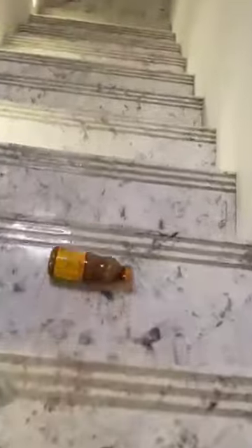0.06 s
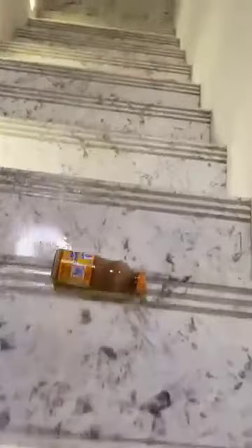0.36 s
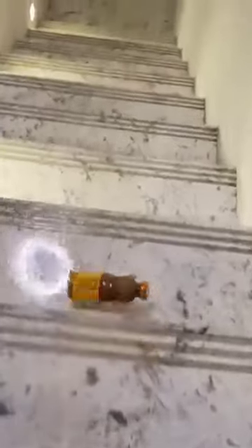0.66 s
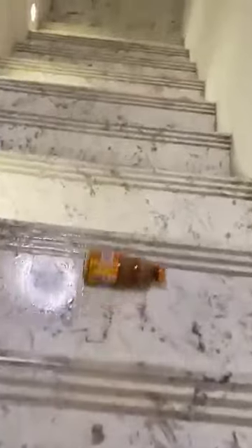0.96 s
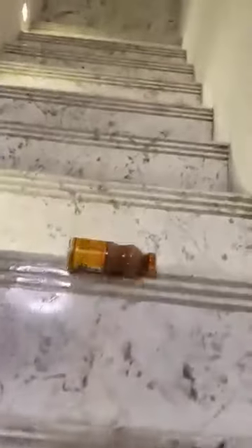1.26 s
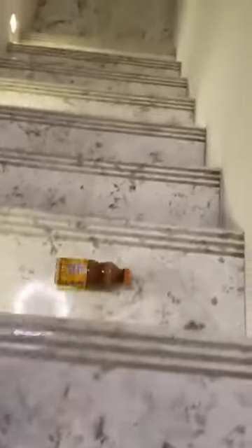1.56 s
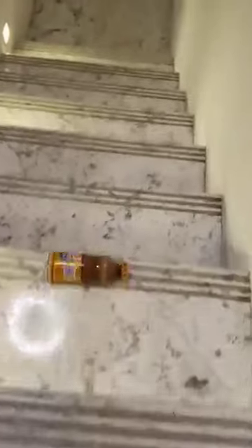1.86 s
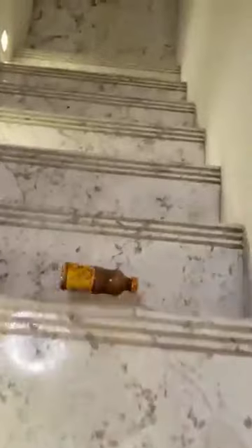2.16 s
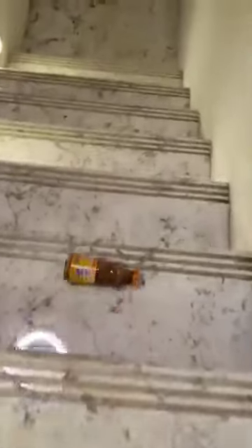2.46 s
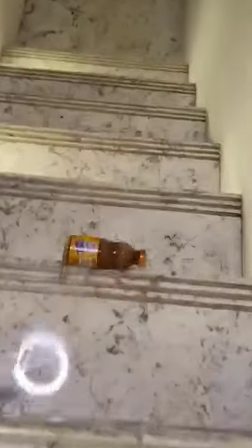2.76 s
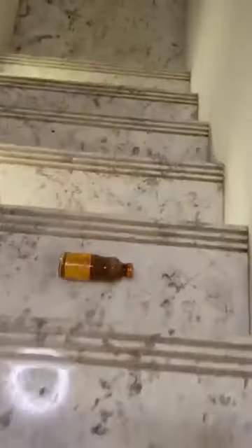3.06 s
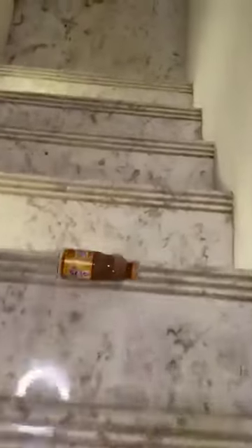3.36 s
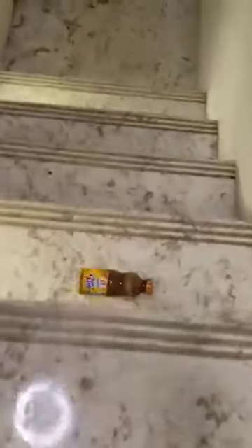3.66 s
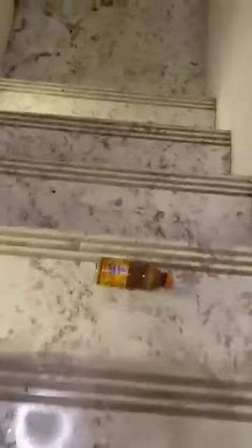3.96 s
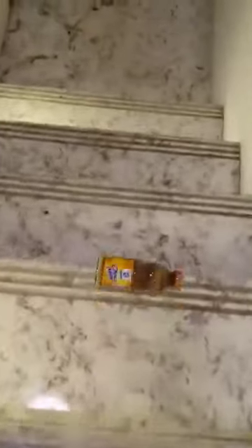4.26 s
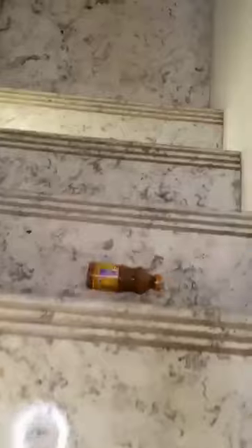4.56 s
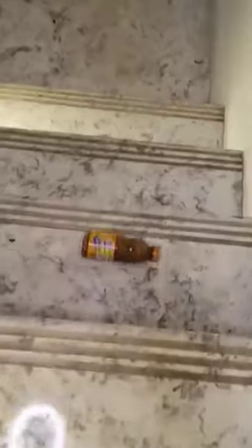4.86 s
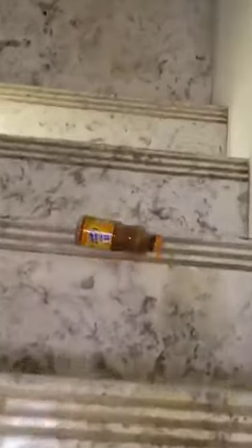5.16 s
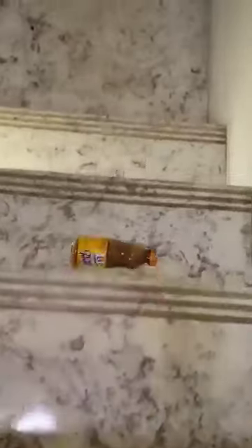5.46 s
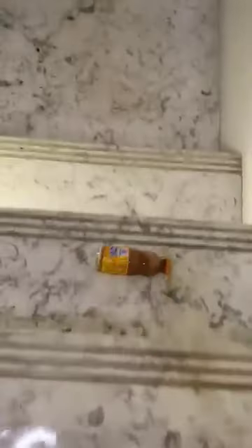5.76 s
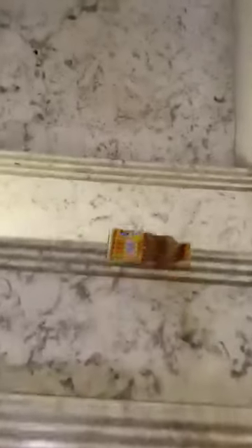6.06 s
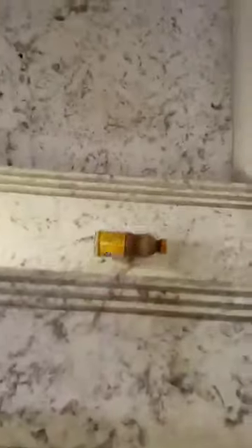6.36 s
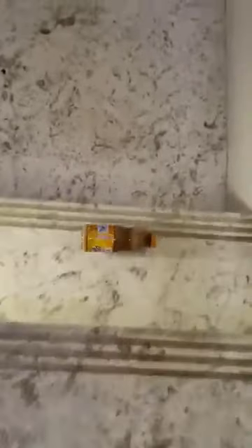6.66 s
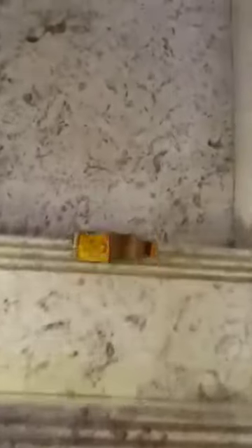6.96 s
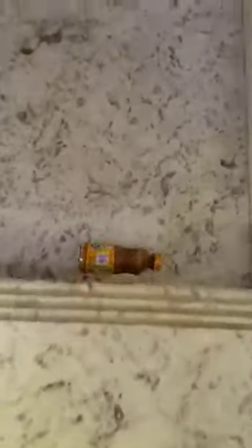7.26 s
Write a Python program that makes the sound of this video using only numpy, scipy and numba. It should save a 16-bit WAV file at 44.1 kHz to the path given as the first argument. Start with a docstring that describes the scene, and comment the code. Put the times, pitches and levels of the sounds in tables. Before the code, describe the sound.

A part-filled plastic bottle rolls down a bare stone stairwell, heard from a phone microphone following close behind. The tail of an earlier impact is still ringing at the start. The bottle lands with a sharp, bright crack at about 0.7, 1.5, 2.2, 3.0, 3.7, 4.6, 5.6 and 6.3 seconds, each with a tiny double bounce and a short echo off the walls. Between landings it wobbles and crosses grooves in clusters of about three lighter, hollow knocks, with brief grinding and a faint slosh of liquid. A last, more hollow cluster comes near 7 seconds. A few soft footsteps and scuffs follow, the clearest thud at about 2.7 seconds and a gritty scuff near 4.2. Underneath are a low rumble, a very faint high whine and a throbbing machine hum that fades from about 3 seconds. Brief low drones swell around 2 to 3 seconds.

```python
"""A bare stone stairwell: a part-filled plastic bottle rolls down, followed by someone with a phone.
Each landing is an impact that excites the shell's modes and the reverberation of the walls. Between
landings the bottle wobbles, knocks over grooves and grinds along the tread while its drink sloshes.
Soft footsteps follow. Two machines beat in a hum that fades with the descent, over rumble, brief
drones and a thin whine. The phone's gain control ducks under every crack."""
import sys
import numpy as np
from scipy import signal
from scipy.fft import rfft, irfft, next_fast_len
from scipy.io import wavfile
from scipy.ndimage import uniform_filter1d, minimum_filter1d
from numba import njit

SR = 44100
rng = np.random.default_rng(int(sys.argv[2]) if len(sys.argv) > 2 else 0)


def store_wav(level_fs):
    """Save 16-bit WAV to argv[1]."""
    pcm = np.round(np.clip(np.atleast_2d(level_fs), -1, 1) * 32767)
    wavfile.write(sys.argv[1], SR, pcm.T.astype(np.int16))


N = 321489
LEAD = SR // 2  # samples before time zero, so an earlier landing is still ringing
TOTAL = N + LEAD
TIME = (np.arange(TOTAL) - LEAD) / SR


def undb(db):
    """Amplitude ratio of a level in decibels."""
    return 10 ** (np.asarray(db) / 20)


def on_log_axis(points, hz):
    """Interpolation of (frequency_hz, level_db) points along a log-frequency axis."""
    point_hz, level_db = np.transpose(points)
    return np.interp(np.log(np.maximum(hz, 1)), np.log(point_hz), level_db)


def response(points, tilt_db=0, size=2048):
    """Minimum-phase impulse response of a spectrum, tilted by tilt_db per octave."""
    hz = np.maximum(np.fft.rfftfreq(size, 1 / SR), 20)
    cepstrum = irfft(np.log(undb(on_log_axis(points, hz) + tilt_db * np.log2(hz / 2500))))
    cepstrum[1:size // 2] *= 2
    cepstrum[size // 2 + 1:] = 0
    return irfft(np.exp(rfft(cepstrum)))


def noise(points, count):
    """Spectral shaping of white noise, scaled to unit rms."""
    gain = undb(on_log_axis(points, np.fft.rfftfreq(count, 1 / SR)))
    coloured = irfft(rfft(rng.standard_normal(count)) * gain, count)
    return coloured / coloured.std()


def fade(t, t60):
    """Exponential decay, 60 dB down after t60 seconds."""
    return np.exp(-np.log(1000) * t / t60)


def rise(t, time_constant_s):
    """Exponential approach to full amplitude."""
    return 1 - np.exp(-t / time_constant_s)


def add(track, start_s, sound):
    """Superposition of a sound on a track."""
    i = int(round(start_s * SR)) + LEAD
    track[i:i + len(sound)] += sound[:len(track) - i]


# Spectrum of plastic striking stone: frequency_hz, level_db
CONTACT_SPECTRUM = [(60, -38), (300, -18), (700, -24.5), (1200, -4), (2500, -13), (4600, -7), (5500, -9.5),
                    (8000, -14), (9300, -19.5)]
# Modes of the bottle's shell: pitch_hz, level_db, t60_s
SHELL_MODES = [(1444, -14.5, 0.0058), (1880, -1.5, 0.0045), (2247, 9, 0.0034), (2670, 3, 0.0039),
               (3797, 7.5, 0.004), (4194, 5, 0.0026)]
def impact(tilt_db, high_db, pitch_ratio, shell_db=-15):
    """Impulse excitation: a contact tick, and damped shell modes that ring for milliseconds."""
    t = np.arange(2048) / SR
    ring = 0
    for hz, db, t60 in SHELL_MODES:
        # the spot that strikes decides how much the high modes ring
        mode_db = db + tilt_db * np.log2(hz / 2500) + high_db * (hz > 3300)
        ring += undb(mode_db) * np.sin(2 * np.pi * pitch_ratio * hz * t) * fade(t, t60)
    return response(CONTACT_SPECTRUM, tilt_db) + undb(shell_db) * ring * rise(t, 0.00037)


# Reverberation bands of the stairwell: centre_hz, t60_s, level_db
REVERB_BANDS = [(108, 1.62, -9.5), (463, 1.155, -10), (910, 1.09, -9.5), (2150, 0.93, -10),
                (4370, 0.81, -1), (6080, 0.7, 4), (9320, 0.53, 0.5), (14000, 0.62, -2)]
# Standing waves between its walls: pitch_hz, level_db, t60_s
ROOM_MODES = [(199.6, -46.5, 3), (391.6, -36.5, 1.8), (581, -39.5, 1.7), (757, -34.5, 1.4),
              (1130, -42.5, 0.81), (1550, -39, 0.76)]
def stairwell(wet_db, gap_s=0.0016, build_s=0.017, early_gain=0.32, size=65536):
    """Room impulse response: direct sound, then reflections that build up and lose their treble first."""
    t, hz = np.arange(size) / SR, np.fft.rfftfreq(size, 1 / SR)
    # scattered strong reflections stand out of the early wash
    scatter = rng.standard_normal(size) * undb(3.7 * rng.standard_normal(size) * fade(t, 0.89))
    white = rfft(scatter / np.sqrt(uniform_filter1d(scatter ** 2, size=1024)))
    log_centres = np.log([band[0] for band in REVERB_BANDS])
    tail = 0
    for selector, (_, t60, db) in zip(np.eye(len(log_centres)), REVERB_BANDS):
        band_gain = np.interp(np.log(hz + 1), log_centres, selector)
        tail += undb(db) * irfft(white * band_gain) * fade(t, t60)
    for mode_hz, db, t60 in ROOM_MODES:
        tail += undb(db) * np.sin(2 * np.pi * (mode_hz * t + rng.random())) * fade(t, t60)
    room = undb(wet_db) * tail * np.clip((t - gap_s) / build_s, early_gain, 1)
    room[0] += 1  # direct sound
    return room


def reverberate(track, wet_db):
    """Convolution with the stairwell's impulse response."""
    return signal.fftconvolve(track, stairwell(wet_db))[:TOTAL]


def hops(count=2, flight_s=0.048, restitution=0.8, first_db=-15.5, loss_db=5):
    """Inelastic bouncing: each hop is weaker and, on average, shorter. Gives (delay_s, level_db)."""
    order = np.arange(count)
    flights_s = flight_s * restitution ** order * (0.5 + rng.random(count))
    return zip(np.cumsum(flights_s), first_db - loss_db * order)


# Landings on the steps: start_s, level_db, high_modes_db, pitch_ratio, tilt_db_per_octave,
# echo_delay_ms, echo_db
LANDINGS = [(-.15, 12.5, -4, 1.06, 2.5, 5.15, -9.5), (0.6724, 16.5, -3, 1.018, 1, 14.2, -14),
            (1.4883, 17.5, -6, 0.99, 1.5, 2.37, -15), (2.2433, 15.5, -4, 1.02, 2, 4, -7.5),
            (2.9604, 16, -4.5, 1.025, 3, 5.14, -9), (3.7040, 12, -3.5, 1.018, 1.5, 6.65, -9.5),
            (4.588, 13.5, -3.5, 1.063, 2, 6.3, -11.5), (5.5690, 13.5, -2, 1.01, 1.5, 7.55, -12),
            (6.3377, 14, -2.5, 1.06, 1.5, 4.9, -11.5)]
def landings(level_db=31.5, wet_db=-26):
    """Impact and close echo: each crack reflects off nearby stone, then the bottle hops."""
    out = np.zeros(TOTAL)
    for start_s, db, high_db, pitch_ratio, tilt_db, echo_delay_ms, echo_db in LANDINGS:
        contact = impact(tilt_db, high_db, pitch_ratio)
        crack = undb(level_db + db) * signal.fftconvolve(contact, stairwell(wet_db))
        add(out, start_s, crack)
        add(out, start_s + echo_delay_ms / 1000, undb(echo_db) * crack)
        for delay_s, hop_db in hops():
            add(out, start_s + delay_s, undb(hop_db) * crack)
    return out


def descent_db(from_s=2.89, loss_db_per_s=5):
    """Attenuation with distance: the machines are steady on the upper steps, then fade."""
    return -loss_db_per_s * np.maximum(TIME - from_s, 0)


def machine_hum(level_db=-15.5, pitch_hz=52.0, beat_hz=6.78, second_db=-4.5, in_phase_s=0.061):
    """Beating: two machines at slightly different speeds interfere at their difference frequency."""
    drift_hz = 0.3 * np.interp(TIME, np.arange(-1, 9), rng.standard_normal(10))
    cycles = np.cumsum(pitch_hz + drift_hz) / SR
    first = np.sin(2 * np.pi * cycles)
    second = np.sin(2 * np.pi * (cycles + beat_hz * (TIME - in_phase_s)))
    return undb(level_db + descent_db()) * (first + undb(second_db) * second)


# Spectrum of the building's air and rumble: frequency_hz, level_db
AIR_SPECTRUM = [(20, -17.5), (40, -4.5), (65, 13), (90, 7), (125, -9), (250, -14.5), (700, -28),
                (2000, -18.5), (5000, -26.5), (9000, -41), (15000, -39)]
def air_rumble(mean_db=-28.5, fade_share=0.26):
    """Broadband background noise, whose level follows a share of the machines' attenuation."""
    distance_db = descent_db()
    level_db = mean_db + fade_share * (distance_db - distance_db.mean())
    return undb(level_db) * noise(AIR_SPECTRUM, next_fast_len(TOTAL))[:TOTAL]


# Partials of a faint electrical whine: pitch_hz, level_db
WHINE_PARTIALS = [(9130, -60.5), (9819, -60)]
def electrical_whine():
    """Superposition of steady pure tones in the high treble."""
    return sum(undb(db) * np.sin(2 * np.pi * hz * TIME) for hz, db in WHINE_PARTIALS)


def knock(detune, pitch_spread=0.13, cutoff_hz=900):
    """Weak radiation of bass: a light touch of the shell moves little air and is duller than a landing."""
    touch = impact(tilt_db=-2, high_db=-8, pitch_ratio=1 + pitch_spread * detune)
    return signal.sosfilt(signal.butter(2, cutoff_hz, "high", fs=SR, output="sos"), touch)


# Treads, each with three grooves along its edge: first_groove_s, second_groove_s, third_groove_s,
# knock_db, rise_db_per_groove, hollow_db, slosh_db
TREAD_CROSSINGS = [(.2056, .275, .3667, -1, 0, -5, 3), (1.038, 1.107, 1.1885, 1, -0.5, -5, 8),
                   (1.853, 1.915, 1.9567, -1, -4.5, -6, -0.5), (2.561, 2.629, 2.6825, 1, -4, -5, 4.5),
                   (3.296, 3.361, 3.438, 0.5, -1, -5, 6), (4.11, 4.168, 4.2615, -5, -4, -3, -6),
                   (5.044, 5.1353, 5.2235, -2.5, -2, -4, -3.5),
                   (5.9249, 5.9877, 6.0613, -1.5, -0.5, -1, -3),
                   (6.845, 6.91, 6.9895, -13, 3.5, 15.5, -0.5)]
def wobble(count=5, lead_s=0.081, span_s=0.25, tap_db=-12.5):
    """Intermittent contact: the uneven bottle taps each tread at random as it nears the edge."""
    out = np.zeros(TOTAL)
    for first_groove_s, _, _, knock_db, *_ in TREAD_CROSSINGS:
        for when, spot in rng.random((count, 2)):
            tap = undb(knock_db + tap_db) * knock(2 * spot - 1)
            add(out, first_groove_s - lead_s + when * span_s, tap)
    return out


def grooves():
    """Surface discontinuities: each groove gives one jolt, (start_s, knock_db, hollow_db, slosh_db)."""
    for *times_s, knock_db, rise_db, hollow_db, slosh_db in TREAD_CROSSINGS:
        for k, start_s in enumerate(times_s):
            yield start_s, knock_db + rise_db * (k - 1), hollow_db, slosh_db


# Modes of the bottle's hollow body: pitch_hz, level_db, t60_s
BODY_MODES = [(866, -8, .06), (1320, -0.5, 0.077), (2126, -0.5, .08)]
def hollow_ring(t, level_db=-33):
    """Free vibration: the whole body rings briefly after a soft knock."""
    ring = sum(undb(db) * np.sin(2 * np.pi * hz * t) * fade(t, t60) for hz, db, t60 in BODY_MODES)
    return undb(level_db) * ring * rise(t, 0.006)


def slosh(t, detune, centre_hz=658, pitch_spread=0.042, bend=0.3, bend_s=0.0018, t60_s=0.038):
    """Damped oscillation: the jolted drink gulps with a falling pitch."""
    settled_hz = centre_hz * (1 + pitch_spread * detune)
    hz = settled_hz * (1 + bend * np.exp(-t / bend_s))
    return np.sin(2 * np.pi * np.cumsum(hz) / SR) * fade(t, t60_s) * rise(t, 0.0034)


def tread_knocks(shell_db=13, liquid_db=-12, shoulder_lag_s=0.007, shoulder_db=-5.5):
    """Shock excitation: the wobbling bottle hits each groove, base then shoulder, and jolts its drink."""
    out, t = np.zeros(TOTAL), np.arange(SR // 8) / SR
    for start_s, knock_db, hollow_db, slosh_db in grooves():
        base_detune, shoulder_detune, lag_scatter, slosh_detune = rng.standard_normal(4)
        strength = undb(shell_db + knock_db)
        shoulder_s = start_s + shoulder_lag_s * np.exp(lag_scatter / 2)
        add(out, start_s, strength * knock(base_detune))
        add(out, start_s, strength * undb(hollow_db) * hollow_ring(t))
        add(out, shoulder_s, strength * undb(shoulder_db) * knock(shoulder_detune))
        add(out, start_s, undb(liquid_db + slosh_db) * slosh(t, slosh_detune))
    return reverberate(out + undb(shell_db) * wobble(), wet_db=-27.5)


# Spectrum of the bottle rolling on stone: frequency_hz, level_db
ROLLING_SPECTRUM = [(100, -27), (280, 1), (420, 3), (650, 5.5), (900, 6), (1500, -6.5), (2400, -13),
                    (4000, -49.5)]
def grinding(level_db=-23, t60_s=0.21):
    """Rolling noise: after each groove the bottle grinds on across the tread for a moment."""
    out, t = np.zeros(TOTAL), np.arange(SR // 3) / SR
    envelope = undb(level_db) * fade(t, t60_s) * rise(t, 0.0057)
    for start_s, *_ in grooves():
        add(out, start_s, envelope * noise(ROLLING_SPECTRUM, len(t)))
    return reverberate(out, wet_db=-27)


# Spectrum of a sole's thud: frequency_hz, level_db
THUD_SPECTRUM = [(40, -16), (120, 1), (200, 14.5), (420, 33), (800, -1.5), (1500, -74), (5000, -42)]
# Spectrum of a sole's scuff: frequency_hz, level_db
SCUFF_SPECTRUM = [(300, -15), (1500, -7), (4000, -9), (7500, 0), (9500, 6), (14000, 6)]
# Footfalls: start_s, sole_db, grit_db
FOOTFALLS = [(1.343, -16, -20), (2.704, 13, -7), (3.428, 0, -11), (4.167, -12, 13.5), (5.137, -36, -3),
             (6.817, -1, -29)]
def footsteps(thud_db=-14.5, thud_t60_s=0.046, scuff_db=-26, scuff_t60_s=0.074):
    """Cushioned impact and friction: soft soles thud on the treads and scrape a little grit."""
    out, t = np.zeros(TOTAL), np.arange(SR // 4) / SR
    for start_s, sole_db, grit_db in FOOTFALLS:
        thud = undb(thud_db + sole_db) * noise(THUD_SPECTRUM, len(t)) * fade(t, thud_t60_s)
        scuff = undb(scuff_db + grit_db) * noise(SCUFF_SPECTRUM, len(t)) * fade(t, scuff_t60_s)
        add(out, start_s, (thud + scuff) * rise(t, 0.0026))
    return reverberate(out, wet_db=-36)


# Brief drones in the stairwell: middle_s, pitch_hz, level_db, length_s
DRONE_TONES = [(2.074, 151, -31.5, .25), (2.703, 204, -24.5, 0.138), (2.998, 198, -40.5, 0.91)]
def drones():
    """Amplitude modulation: low pure tones swell and die away under Gaussian envelopes."""
    out = np.zeros(TOTAL)
    for middle_s, hz, db, length_s in DRONE_TONES:
        swell = np.exp(-(2 * (TIME - middle_s) / length_s) ** 2)
        out += undb(db) * np.sin(2 * np.pi * hz * TIME) * swell
    return out


def scene():
    """Linear superposition: all sources add at one microphone."""
    moving = landings() + tread_knocks() + grinding() + footsteps()
    building = machine_hum() + air_rumble() + electrical_whine() + drones()
    mono = (moving + building)[LEAD:]
    return np.array([mono, mono])


@njit
def follow(rectified, attack, release):
    """Envelope detection with separate rise and fall rates, already settled on the opening sound."""
    out, level = np.empty(len(rectified)), 2 * np.mean(rectified[:512])
    for i, sample in enumerate(rectified):
        level += (sample - level) * (attack if sample > level else release)
        out[i] = level
    return out


# Response of the phone's microphone, which loses the top treble: frequency_hz, gain_db
MIC_RESPONSE = [(20, -7), (9200, -4.5), (9800, -15), (10400, -27.5), (15000, -38)]
def record(dry, knee_db=-11.0, ratio=2.25, release_s=0.089, attack_s=0.00045, cutoff_hz=15800):
    """Dynamic range compression: gain ducks under each crack; limiting, clipping and a low-pass follow."""
    mono = signal.fftconvolve(dry[0], response(MIC_RESPONSE))[:N]
    envelope = follow(np.abs(mono), 1 / (attack_s * SR), 1 / (release_s * SR))
    mono *= np.minimum(1, undb(knee_db) / (envelope + 1e-9)) ** (1 - 1 / ratio)
    # centred windows let the limiter look a little ahead
    limiter_gain = minimum_filter1d(1 / np.maximum(np.abs(mono), 1), size=21)
    mono = np.clip(mono * uniform_filter1d(limiter_gain, size=21), -1, 1)
    mono = signal.sosfilt(signal.ellip(8, 0.2, 70, cutoff_hz, fs=SR, output="sos"), mono)
    return np.array([mono, mono])


dry = scene()
out = record(dry)
store_wav(out)
```